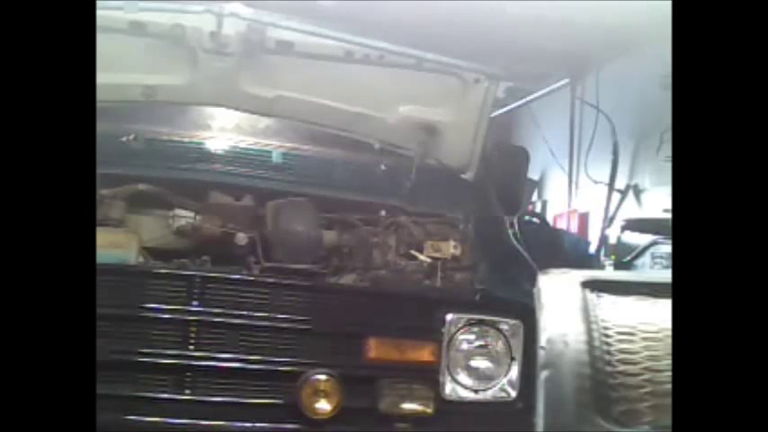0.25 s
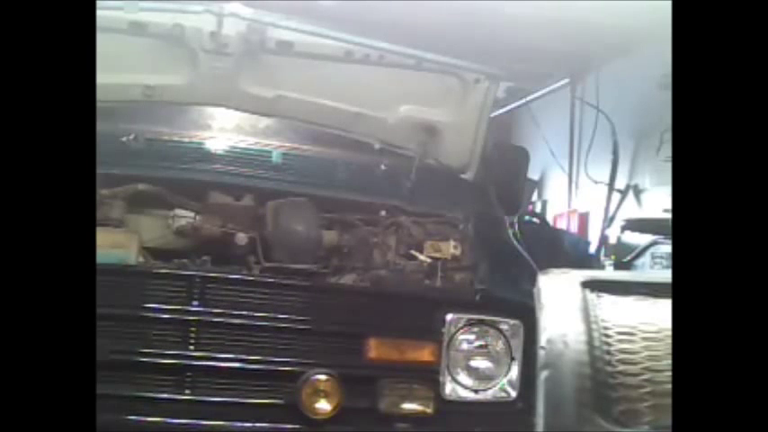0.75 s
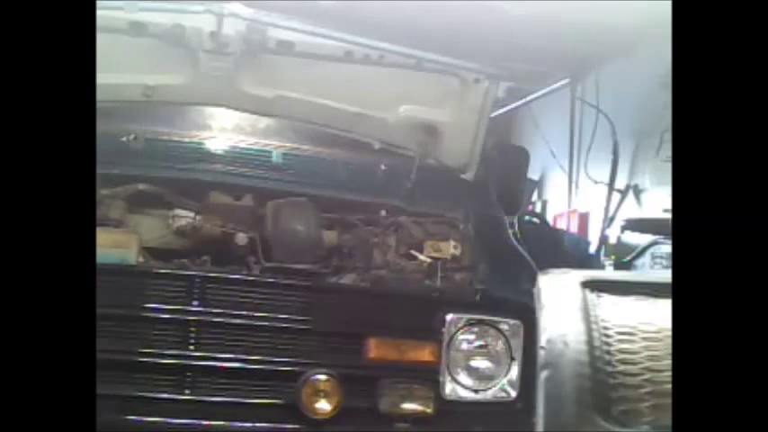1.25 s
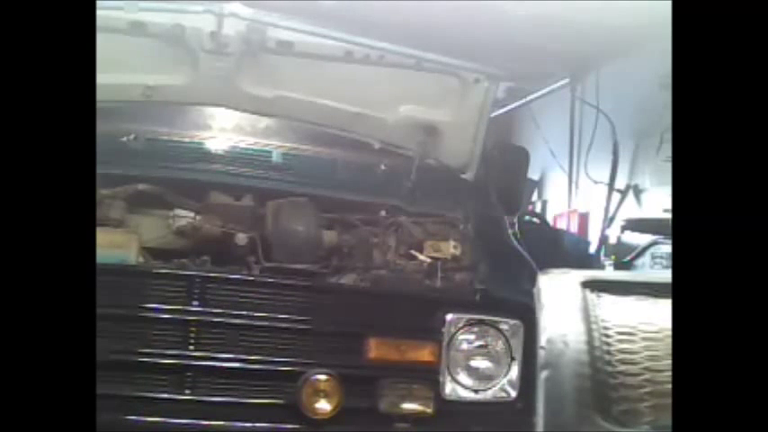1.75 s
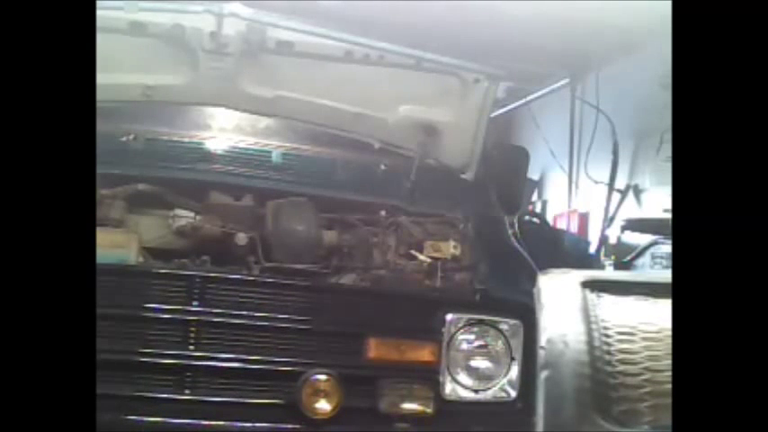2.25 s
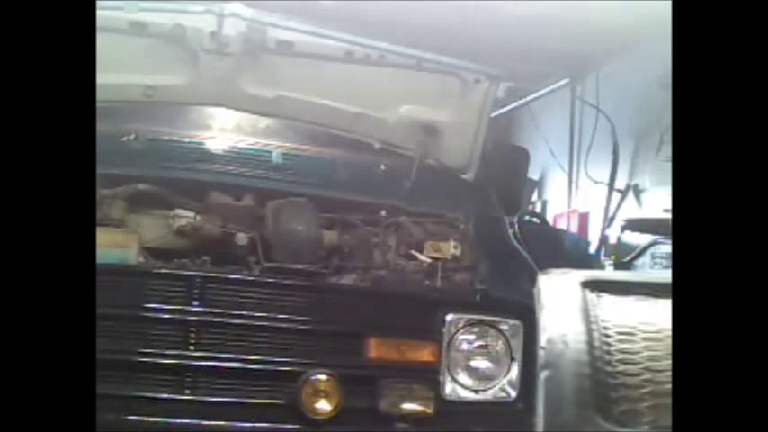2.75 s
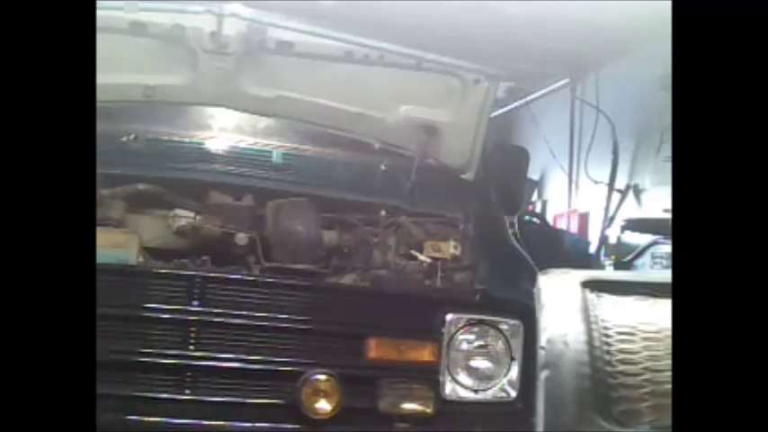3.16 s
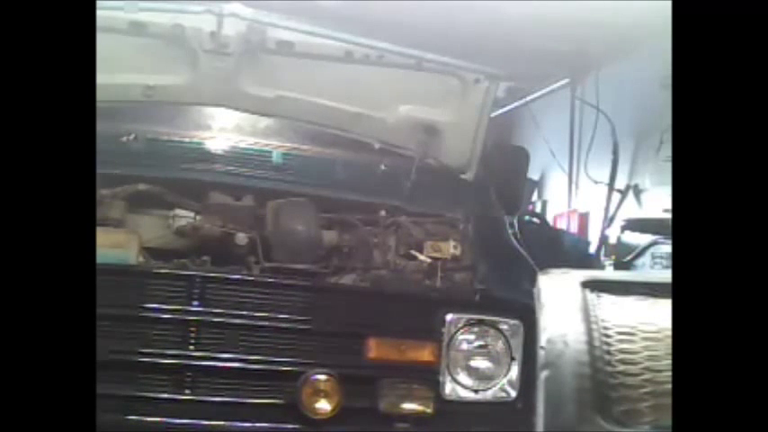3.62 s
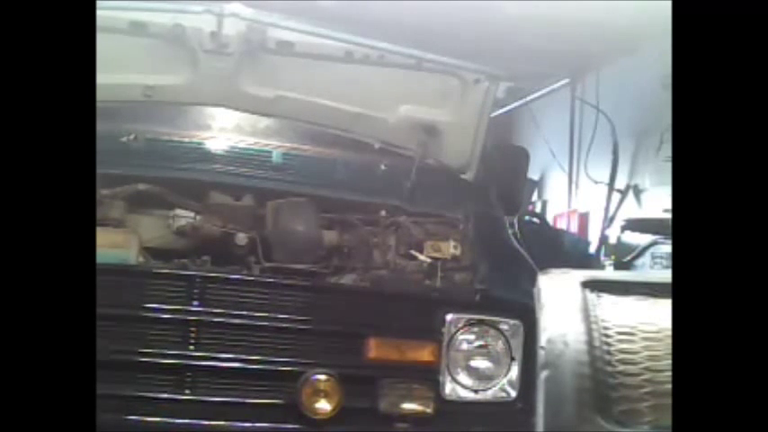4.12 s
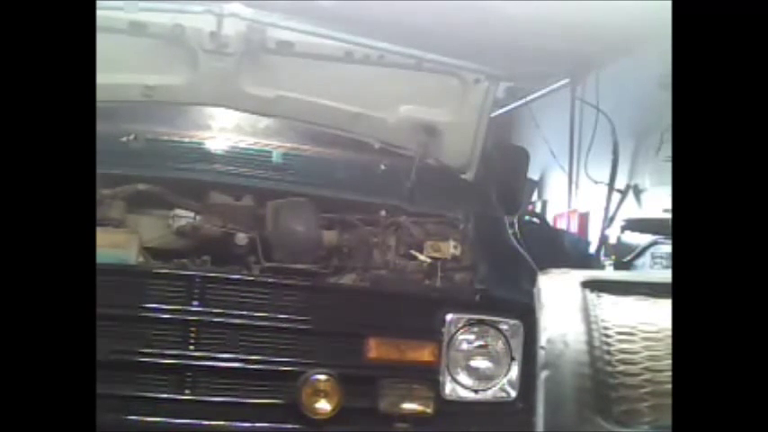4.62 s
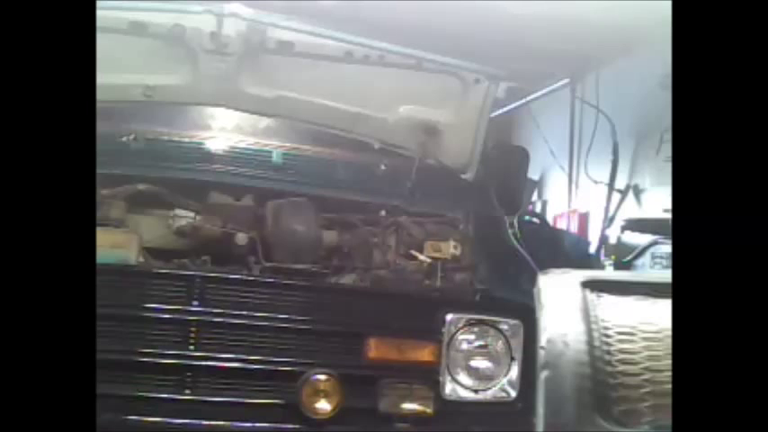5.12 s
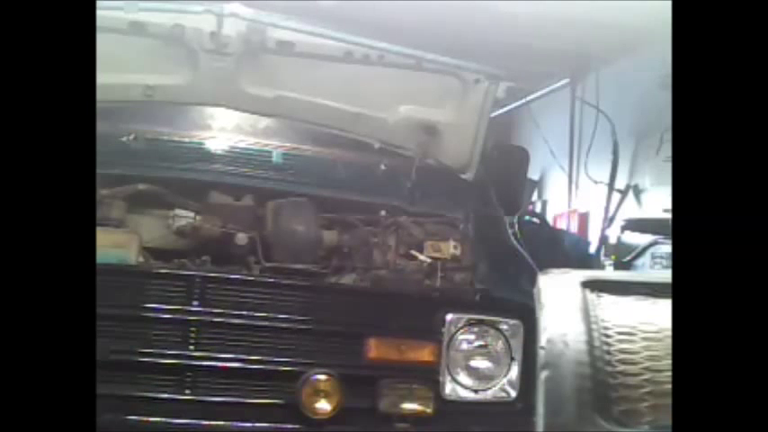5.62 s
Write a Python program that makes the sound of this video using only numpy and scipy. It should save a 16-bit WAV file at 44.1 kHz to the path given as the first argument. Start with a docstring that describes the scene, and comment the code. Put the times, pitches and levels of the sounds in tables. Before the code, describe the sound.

From 0 to 1.3 s an old four-cylinder petrol engine idles evenly, close at the open front of a van: low throbbing drone, humming fan, grainy air rush, soft valve ticks and faintly ringing loose metal. At 1.35 s a touch of throttle brings a sharp intake boom and heavy thumps; speed jumps, hovers, and further touches at 1.9 and 2.2 s push it to twice idle around 2.3 s, with a loud rush, rough growl and high metallic singing near 2.0 to 2.15 s. From 2.4 s it drops, lumpy and fluttering, reaching idle by 3.1 s. It runs steadily until 4.2 s, then sags to a slow, stumbling throb around 4.4 to 4.6 s. A small throttle touch at 4.7 s lifts it slightly above idle by 5 s, with a faint metallic ring, and it settles to the end. Narrow, nearly mono sound, faint hiss, short room echo.

```python
"""In a garage, an old van's four-cylinder petrol engine idles with the bonnet open, heard from the grille.
Touches of the throttle swell it to twice its speed; it falls back, sags below idle and recovers.
One crankshaft and its fan pitch the sine orders that throb, drone, growl and hum.
Damped swings thump at pitches of their own; noise bands and wavering sines ring as loose metal.
Noise coloured by the engine bay makes the fan's rush, intake roar and valve ticks, over a faint hiss."""
import sys
import numpy as np
from scipy import signal
from scipy.fft import rfft, irfft, next_fast_len
from scipy.io import wavfile
from scipy.ndimage import uniform_filter1d, map_coordinates

SR = 44100
rng = np.random.default_rng(int(sys.argv[2]) if len(sys.argv) > 2 else 0)


def output_pcm(signal):
    """Save a mono or channel-first signal as 16-bit PCM at the path in sys.argv[1].

    Samples are clipped to [-1, 1] before scaling.
    """
    pcm = np.clip(np.atleast_2d(signal).T, -1, 1) * 32767
    wavfile.write(sys.argv[1], SR, np.round(pcm).astype(np.int16))


N = 259308  # samples


def amp(db):
    """Decibels to gain."""
    return 10 ** (np.asarray(db) / 20)


def unit(x):
    """Scale to rms 1."""
    return x / np.sqrt(np.mean(x ** 2) + 1e-20)


def along(points, hz):
    """Read a curve of (Hz, value) points on a log frequency axis."""
    point_hz, value = np.transpose(points)
    return np.interp(np.log(hz + 1), np.log(point_hz + 1), value)


def wobble(rate):
    """A smooth random curve, rate knots a second."""
    knots = rng.standard_normal(int(N * rate / SR) + 4)
    return map_coordinates(knots, [np.arange(N) * rate / SR])


def filtered(x, response):
    """Multiply the spectrum of x by a response of frequency."""
    size = next_fast_len(N + SR // 2)
    return irfft(rfft(x, size) * response(np.fft.rfftfreq(size, 1 / SR)), size)[..., :N]


def shaped(x, spectrum):
    """Give x a broad spectrum drawn in decibels, at rms 1."""
    return unit(filtered(x, lambda hz: amp(along(spectrum, hz))))


def resonance(hz, centre, width):
    """A bell of height 1 around a centre frequency."""
    return 1 / (1 + (2 * (hz - centre) / width) ** 2)


def spell(middle, half):
    """A smooth swell of height 1 around a moment."""
    return np.exp(-((np.arange(N) / SR - middle) / half) ** 2)


def mode(hz, width):
    """One narrow mode kept ringing by random vibration, at rms 1."""
    return unit(filtered(rng.standard_normal(N), lambda f: resonance(f, hz, width)))


def tone(turns, order, waver_db, waver_rate):
    """One slightly unsteady multiple of a shaft's rotation, at rms 1."""
    phase = 2 * np.pi * (order * turns + rng.random())
    return unit(np.sin(phase) * amp(waver_db * wobble(waver_rate)))


# how the body passes low tones as they glide: pitch_hz, gain_db
BODY_RESPONSE = [(20, 1), (62, -1), (92, 5.5), (108, 1), (125, -0.5), (150, -8), (175, -3), (300, 3),
                 (400, -5), (700, -8)]


def shaft_tones(turns, orders, waver_db):
    """Multiples of a shaft's rotation rise and fall as they glide through the body's response."""
    speed = np.gradient(turns) * SR
    total = 0
    for order, db in orders:
        body_db = along(BODY_RESPONSE, order * speed)
        total = total + amp(db + body_db) * tone(turns, order, waver_db, waver_rate=12)
    return total


# resonances of the engine bay: centre_hz, width_hz, lift_db
BAY_RESONANCES = [(320.3, 120, 10.5), (461.3, 68, 10.5), (587.5, 51, 8.5), (712, 16, 3.5), (802.5, 32, 7.5),
                  (935, 32, 3), (979, 71, 5), (1146, 21, 2), (1327, 21, 5.5), (2050, 240, 2.5),
                  (2473, 81, 2.5), (3550, 340, 4.5), (4512, 210, 13.5)]


def in_bay(x, spectrum):
    """Give x a broad spectrum and the resonances of the engine bay, at rms 1."""
    def response(hz):
        lift_db = sum(db * resonance(hz, centre, width) for centre, width, db in BAY_RESONANCES)
        return amp(along(spectrum, hz) + lift_db)
    return unit(filtered(x, response))


# colour of the hiss: pitch_hz, relative_level_db
HISS_SPECTRUM = [(1000, -8), (3500, 6), (4200, 0), (4550, 7.5), (5200, -12.5), (5800, 5), (6700, -23)]


def hiss():
    """Faint noise with small random patches in time and pitch, partly different in each channel."""
    noise = rng.standard_normal(N) + 0.19 * rng.standard_normal((2, N))
    bins = signal.stft(noise, nperseg=1024)[2]
    patches = uniform_filter1d(rng.standard_normal(bins.shape[1:]), 3, 0)  # across pitch
    patches = unit(uniform_filter1d(patches, 6, 1))  # across time
    patchy_db = 5.0
    patchy = signal.istft(bins * amp(patchy_db * patches), nperseg=1024)[1][:, :N]
    return amp(-47.5) * shaped(patchy, HISS_SPECTRUM)


# how long the walls ring: pitch_hz, decay_to_minus_60_db_s
GARAGE_DECAY = [(200, 0.097), (2000, 0.24), (7000, 0.077)]


def garage(x, wet_db):
    """Add the walls' answer, in which each frequency dies at its own speed."""
    hz, t, bins = signal.stft(rng.standard_normal(SR // 3), SR, nperseg=256)
    decay_s = along(GARAGE_DECAY, hz)[:, None]
    tail = signal.istft(bins * amp(-60 * t / decay_s), SR, nperseg=256)[1]
    echo = signal.fftconvolve(x, tail / np.linalg.norm(tail))[:N]
    return unit(x + amp(wet_db) * echo)


# light metal parts that keep ringing: centre_hz, width_hz, idle_level_db
RINGING_PARTS = [(1988, 7.6, -44), (2049, 16, -42.5)]
# duller panel modes under them: centre_hz, width_hz, idle_level_db
PANEL_MODES = [(171.3, 12, -47.5), (317, 17, -50.5), (933, 12, -48.5), (1007, 14, -46)]
# a loose metal part sings out: middle_s, half_length_s, pitch_hz, level_db
SINGING_PARTS = [(2.0, .06, 2062, -30), (2.029, 0.044, 1953, -23.5), (2.143, 0.062, 1945, -25),
                 (2.773, .08, 824, -31), (3.338, .05, 2000, -36), (3.547, 0.036, 1990, -42.5),
                 (4.769, 0.13, 2055, -37.5), (4.901, .05, 2050, -41), (4.919, 0.051, 1990, -36.5)]
SING_WAVER_HZ = 4  # scale of the random pitch waver


def ringing_metal(revs):
    """Vibration keeps narrow metal modes ringing, louder with speed; now and then one sings out."""
    parts = sum(amp(db) * mode(hz, width) for hz, width, db in RINGING_PARTS + PANEL_MODES)
    sung = 0
    for s, half, hz, db in SINGING_PARTS:
        pitch_hz = hz + SING_WAVER_HZ * wobble(25)
        sine = unit(np.sin(2 * np.pi * np.cumsum(pitch_hz) / SR))
        sung = sung + amp(db) * spell(s, half) * sine
    return amp(4 * revs) * parts + sung


def valve_gear(turns, tick_life, scatter_db, spread_db, count=8):
    """Eight tappets tick in turn every two revolutions, as noise bursts of differing strength."""
    starts = np.flatnonzero(np.diff(np.floor(turns * count / 2)))
    t = np.arange(SR // 20) / SR
    tappet_db = spread_db * rng.standard_normal(count)
    tick_db = tappet_db[np.arange(len(starts)) % count] + scatter_db * rng.standard_normal(len(starts))
    noise = rng.standard_normal((len(starts), len(t)))
    ticks = amp(tick_db)[:, None] * noise * np.exp(-t / tick_life)
    places = starts[:, None] + np.arange(len(t))
    return unit(np.bincount(places.ravel(), ticks.ravel(), N)[:N])  # overlapping ticks add up


def chatter(turns, size=2048):
    """Pistons, chain and cams rattle in the same uneven pattern every two revolutions."""
    pattern = rng.standard_normal(size)
    return unit(map_coordinates(pattern, [turns / 2 % 1 * size], mode="grid-wrap"))


PULLEY = 1.905  # fan turns per crank turn
# multiples of the fan speed: order, level_db (at idle, before the body's response)
FAN_ORDERS = [(2, -37), (3, -43), (4, -46.5), (5, -44.5), (8, -51.5)]
# resonances the blade tone meets as it climbs: centre_hz, width_hz, lift_db
SHROUD_RESONANCES = [(258, 21, 7.5), (322.4, 65, 20.5)]
BLADES = 7
BLADE_DB, BLADE_DB_PER_OCTAVE = -43, 6  # at idle before the shroud's lift, and growth with speed
BLADE_FADE_DB_PER_S = 1.2


def fan(turns, speed, revs):
    """The fan outruns the crank; uneven blades hum at multiples of its speed, with a fading blade tone."""
    spin = PULLEY * turns
    hum = amp(3.5 * revs) * shaft_tones(spin, FAN_ORDERS, waver_db=-0.5)
    blade_hz = BLADES * PULLEY * speed
    shroud_db = sum(db * resonance(blade_hz, hz, width) for hz, width, db in SHROUD_RESONANCES)
    fade_db = BLADE_FADE_DB_PER_S * np.arange(N) / SR
    blade_db = BLADE_DB + BLADE_DB_PER_OCTAVE * revs + shroud_db - fade_db
    return hum + amp(blade_db) * tone(spin, BLADES, waver_db=0.5, waver_rate=8)


# colour of the mechanical rush: pitch_hz, relative_level_db
RUSH_SPECTRUM = [(300, -35.5), (600, -9), (800, -5), (1100, 1.5), (1800, 1), (2200, -3.5), (2650, -5),
                 (3200, -17.5), (4100, -21.5), (4900, -31.5), (5250, -37), (5700, -23), (6100, -29.5),
                 (6600, -69)]
# colour of the intake roar: pitch_hz, relative_level_db
ROAR_SPECTRUM = [(70, -35.5), (130, -0.5), (190, -2.5), (310, -4.5), (400, -9), (700, -12), (1000, -29.5),
                 (2000, -43.5), (5000, -99)]
RUSH_DB, RUSH_DB_PER_OCTAVE, RUSH_OPEN_DB = -29, 14, 3  # at idle, with speed, at full opening
LABOUR_DB_PER_OCTAVE = 4.5  # further loss of rush below idle
CHATTER_DB = -9  # against the air noise


def machinery(turns, revs, opening):
    """Fan-torn air, block clatter and stroke-pulsed intake fill the bay, growing with speed and throttle."""
    labour_db = LABOUR_DB_PER_OCTAVE * np.minimum(revs, 0)
    rush_db = RUSH_DB + RUSH_DB_PER_OCTAVE * revs + labour_db + RUSH_OPEN_DB * opening
    fan_pulse_db = 0.5 * np.cos(2 * np.pi * PULLEY * turns)
    air = unit(rng.standard_normal(N) * amp(fan_pulse_db))
    ticks = valve_gear(turns, tick_life=0.014, scatter_db=3.0, spread_db=0.4)
    clatter = ticks * amp(-4 * revs)  # air noise covers the ticks as speed rises
    knocks = amp(CHATTER_DB) * chatter(turns)
    rush = in_bay(air + amp(-5.5) * clatter + knocks, RUSH_SPECTRUM)
    stroke_pulse_db = 0.57 * np.cos(4 * np.pi * turns)  # two strokes a turn
    intake = unit(rng.standard_normal(N) * amp(stroke_pulse_db))
    roar = in_bay(intake + knocks, ROAR_SPECTRUM)
    return amp(rush_db) * (rush + amp(-6.0 - 1.8 * revs) * roar)


# touches of the throttle: start_s, held_s, opening_0_to_1, boom_db (carburettor, before its orders)
THROTTLE_TOUCHES = [(1.34, 0.17, 0.7, -25.5), (1.86, 0.11, 0.34, -49), (2.17, 0.3, 0.36, -37.5),
                    (4.689, 0.27, 0.2, -43)]
OPEN_S, CLOSE_S = 0.05, 0.038  # the throttle's rise time and its decay time


def touch(s, held, decay_s):
    """One touch of the throttle: a quick rise, a hold and a decay."""
    t = np.arange(N) / SR - s
    return np.clip(t / OPEN_S, 0, 1) * np.exp(-np.maximum(t - held, 0) / decay_s)


def throttle_opening():
    """Touches add up to the throttle's opening."""
    return sum(depth * touch(s, held, CLOSE_S) for s, held, depth, _ in THROTTLE_TOUCHES)


# carburettor boom, in multiples of the crank speed: order, relative_level_db
GULP_ORDERS = [(2, -9.5), (3, 2), (4, -6), (5, 1)]
BOOM_DECAY_S = 0.18  # the boom outlasts the touch


def carburettor(turns):
    """Each touch of the throttle lets the intake strokes boom at crank orders, then die away."""
    boom = sum(amp(db) * touch(s, held, BOOM_DECAY_S) for s, held, _, db in THROTTLE_TOUCHES)
    gulps = sum(amp(db) * tone(turns, order, waver_db=1.8, waver_rate=16) for order, db in GULP_ORDERS)
    return boom * gulps


# growl in multiples of the crank speed: order, level_db (at twice idle speed)
GROWL_ORDERS = [(10, -35), (18, -42.5), (21, -36.5), (24, -37), (32.5, -34), (38.4, -32), (48, -37.5),
                (53.5, -29), (55, -31), (61, -33), (85, -36.5)]
GROWL_DB_PER_OCTAVE = 33


def growl(turns, revs):
    """Engine orders rise steeply in level with speed and arch over the top of the rev."""
    stack = sum(amp(db) * tone(turns, order, waver_db=2.5, waver_rate=18) for order, db in GROWL_ORDERS)
    return amp(GROWL_DB_PER_OCTAVE * (revs - 1)) * stack


# spells of lumpy burning under load: middle_s, half_length_s, level_db
LUMPY_SPELLS = [(1.499, 0.11, -33), (1.8, 0.065, -38.5), (2.168, 0.09, -30), (2.391, .09, -28),
                (2.849, 0.11, -37), (4.242, .05, -35)]
# colour of the lumps: pitch_hz, relative_level_db
LUMP_SPECTRUM = [(25, -30.5), (45, -4), (70, 4.5), (105, 1.5), (135, -19.5), (250, -51.5)]


def lumpy_burning(turns):
    """Under load, uneven firings break the hum into lumps of low noise pulsing twice a turn."""
    firing = 1 + 0.8 * np.cos(4 * np.pi * turns)
    lumps = shaped(firing * rng.standard_normal(N), LUMP_SPECTRUM)
    return lumps * sum(amp(db) * spell(s, half) for s, half, db in LUMPY_SPELLS)


# single hard firings in the exhaust: start_s, pitch_hz, level_db (before the swing's envelope)
HARD_FIRINGS = [(1.431, 66.7, -12.5), (1.493, 49.4, -17), (1.514, 65.8, -13.5), (1.661, 34, -15),
                (2.067, 40.1, -14.5), (2.335, 46.7, -13.5), (2.358, 47.7, -14), (2.401, 50.6, -15.5),
                (2.497, 40.3, -16.5), (2.681, 30.6, -16.5), (2.805, 45.3, -14.5), (3.055, 44.9, -22),
                (4.205, 40.7, -19), (4.268, 60.3, -20.5), (4.4, 24.4, -17.5), (4.543, 29.9, -22),
                (4.764, 68.8, -14.5), (4.815, 28, -20), (5.08, 24.1, -24.5), (5.232, 25.3, -16.5),
                (5.272, 32.6, -18)]
THUMP_RISE_S, THUMP_CYCLES = 0.0014, 0.87  # attack, and the cycles over which it dies


def thumps():
    """A hard firing sucks, then pushes: one heavy swing of the air in the pipe that dies at once."""
    out = np.zeros(N + SR)
    t = np.arange(SR // 4) / SR
    for s, hz, db in HARD_FIRINGS:
        envelope = (1 - np.exp(-t / THUMP_RISE_S)) * np.exp(-hz * t / THUMP_CYCLES)
        swing = -np.sin(2 * np.pi * hz * t) * envelope
        out[round(s * SR):][:len(t)] += amp(db) * swing
    return out[:N]


# multiples of the crank speed: order, level_db (before the throb level and the body's response)
CRANK_ORDERS = [(1, -36), (2, -34.5), (3, -41), (4, -43.5), (5, -37.5), (7, -50), (9, -49.5), (10, -53),
                (14, -49), (16, -47.5), (19, -52.5), (22, -45.5), (24, -53), (25, -45.5), (26, -49.5),
                (28, -47)]
# moments when the throb weakens: middle_s, half_length_s, change_db
THROB_LULLS = [(1.982, 0.043, -8.5), (2.59, 0.07, -2.5), (4.627, 0.14, -1.5)]
THROB_DB, THROB_DB_PER_OCTAVE = -1.5, 6  # at idle, and growth with speed


def firing_throb(turns, revs):
    """Crank orders throb, stronger with speed and weaker in the lulls."""
    lull_db = sum(db * spell(s, half) for s, half, db in THROB_LULLS)
    throb_db = THROB_DB + THROB_DB_PER_OCTAVE * revs + lull_db
    return amp(throb_db) * shaft_tones(turns, CRANK_ORDERS, waver_db=0.5)


# exhaust pipe resonances the drone glides through: centre_hz, width_hz, level_db (before drone changes)
PIPE_RESONANCES = [(81.9, 22, -29), (101.2, 8.2, -28.5), (124, 14, -43.5), (155, 12, -37), (176, 16, -23),
                   (196, 17, -31)]
# moments when the drone swells or sinks: middle_s, half_length_s, change_db
DRONE_SWELLS = [(2.22, 0.035, 6), (2.45, 0.047, 4.5), (3.17, 0.12, -6.5), (4.12, 0.22, 2), (4.73, .04, 9),
                (4.9, 0.051, 3.5), (5.08, 0.097, -7)]
DRONE_ORDER = 8  # multiple of the crank speed
DRONE_OPEN_DB, DRONE_FADE_DB_PER_S = 6.5, 1  # lift at full opening, and slow weakening


def pipe_drone(turns, speed, opening):
    """One crank order drones where it meets a pipe resonance, and an open throttle lifts it."""
    pipe = sum(amp(db) * resonance(DRONE_ORDER * speed, hz, width) for hz, width, db in PIPE_RESONANCES)
    fade_db = DRONE_FADE_DB_PER_S * np.arange(N) / SR
    swell_db = sum(db * spell(s, half) for s, half, db in DRONE_SWELLS)
    drone_db = DRONE_OPEN_DB * opening - fade_db + swell_db
    return pipe * amp(drone_db) * tone(turns, DRONE_ORDER, waver_db=0.4, waver_rate=9.8)


# spells of uneven burning, added to the steady flutter: middle_s, half_length_s, level_db
STUMBLES = [(2.388, 0.12, -31), (2.904, 0.28, -33), (4.355, 0.22, -38.5)]
# colour of the exhaust puffs: pitch_hz, relative_level_db
RUMBLE_SPECTRUM = [(6, -39), (16, -2.5), (25, 12.5), (38, -9.5), (70, -8), (90, -12.5), (130, -29.5),
                   (400, -72)]
FLUTTER_DB = -42.5  # between the spells


def exhaust_flutter(turns):
    """Uneven firings flutter as low noise pulsing twice a turn, louder when the burning stumbles."""
    flutter = amp(FLUTTER_DB) + sum(amp(db) * spell(s, half) for s, half, db in STUMBLES)
    firing = 1 + 0.44 * np.cos(4 * np.pi * turns)
    return flutter * shaped(firing * rng.standard_normal(N), RUMBLE_SPECTRUM)


def exhaust(turns, speed, revs, opening):
    """The firing throb, the pipe's drone and the flutter of uneven firings leave the exhaust together."""
    return firing_throb(turns, revs) + pipe_drone(turns, speed, opening) + exhaust_flutter(turns)


# crankshaft speed before the flywheel rounds it: time_s, speed_turns_per_s
CRANK_SPEED = [(0, 12), (1.33, 12.8), (1.43, 15.6), (1.52, 16.14), (1.63, 17.2), (1.8, 15.95), (1.87, 17.7),
               (1.99, 20.25), (2.1, 20.4), (2.18, 21.8), (2.25, 23.7), (2.33, 24.3), (2.47, 20.65),
               (2.7, 16.35), (3.1, 12.96), (3.35, 12.9), (3.9, 12.93), (4.22, 12.4), (4.39, 9.5),
               (4.64, 10.03), (4.83, 12.1), (4.96, 13.1), (5.07, 13.1), (5.22, 12.36), (5.4, 12.1),
               (5.88, 12.17)]
INERTIA_S = 0.053  # the flywheel's averaging time


def crankshaft():
    """The crank follows its speed curve while the flywheel rounds off the changes."""
    time_s, turns_per_s = np.transpose(CRANK_SPEED)
    drawn = np.interp(np.arange(N) / SR, time_s, turns_per_s)
    return uniform_filter1d(drawn, int(INERTIA_S * SR))


def scene():
    """Mix the engine's parts around one crankshaft; a faint echoing side signal and the hiss add width."""
    speed = crankshaft()
    opening = throttle_opening()
    turns = np.cumsum(speed) / SR
    revs = np.log2(speed / speed[0])  # octaves above idle
    engine = ringing_metal(revs) + fan(turns, speed, revs) + machinery(turns, revs, opening)
    engine += carburettor(turns) + growl(turns, revs) + lumpy_burning(turns)
    engine += thumps() + exhaust(turns, speed, revs, opening)
    side = amp(-55.0) * garage(engine, wet_db=17.5)
    return np.array([engine - side, engine + side]) + hiss()


TOP_HZ = 6450  # band limit


def record(dry):
    """Round off the highest peaks towards a ceiling of 0.85, then keep nothing above the band limit."""
    rounded = dry / (1 + (dry / 0.85) ** 6) ** (1 / 6)
    return filtered(rounded, lambda hz: hz < TOP_HZ)


dry = scene()
out = record(dry)
output_pcm(out)
```